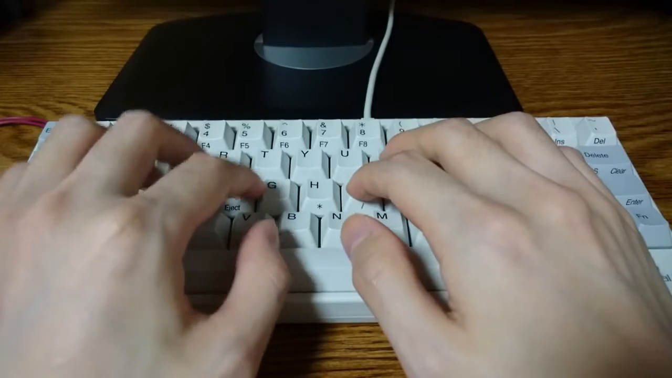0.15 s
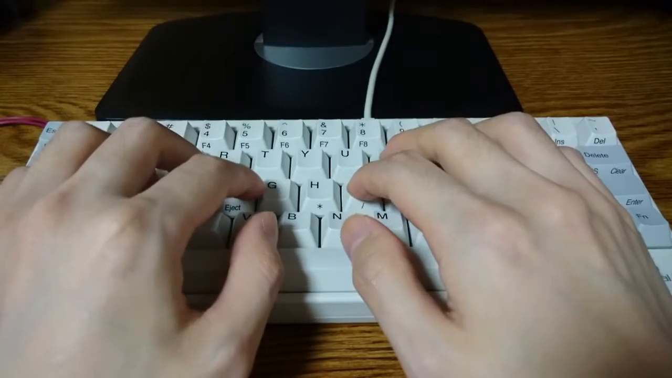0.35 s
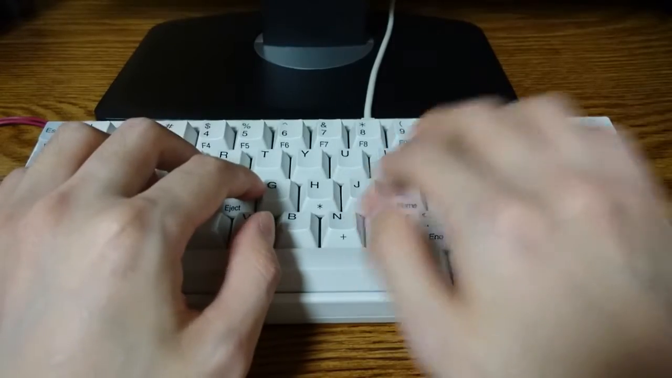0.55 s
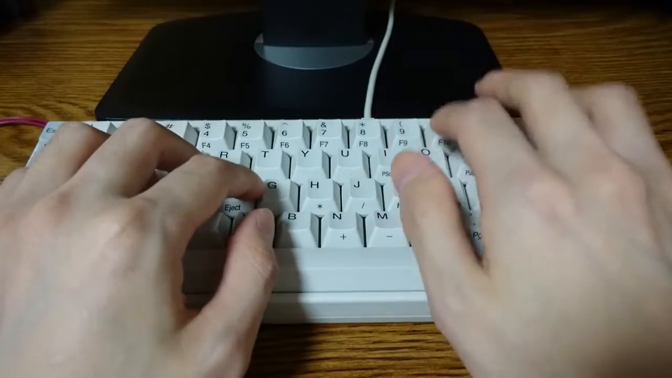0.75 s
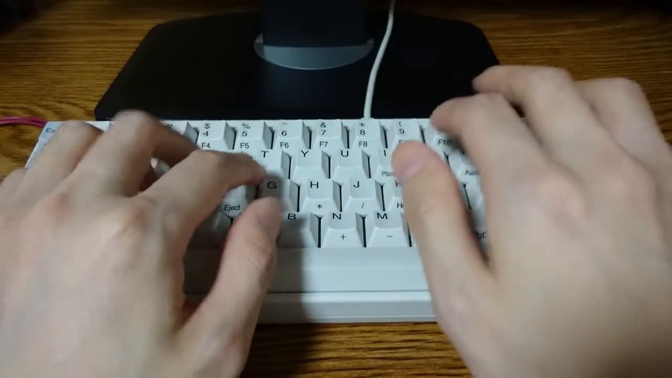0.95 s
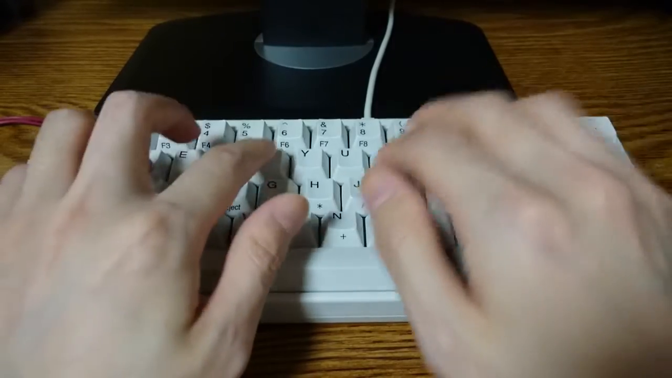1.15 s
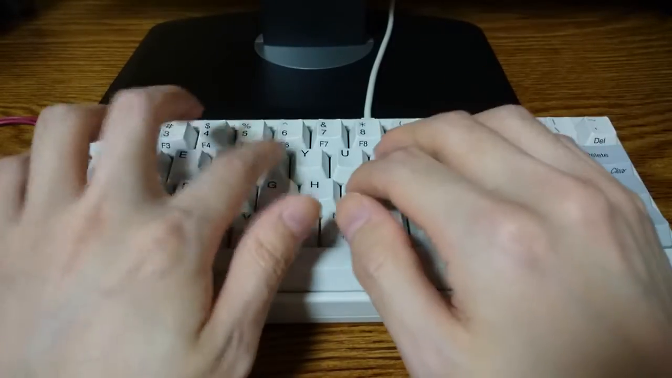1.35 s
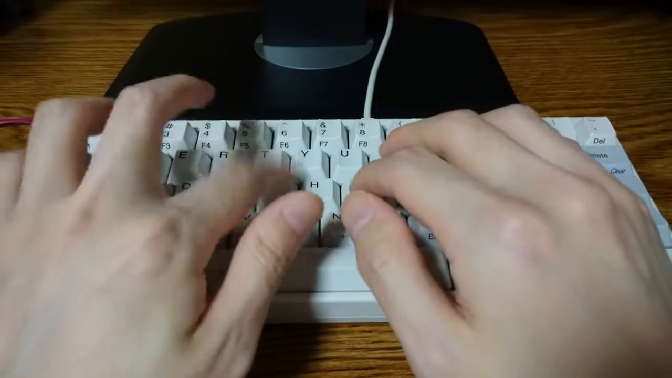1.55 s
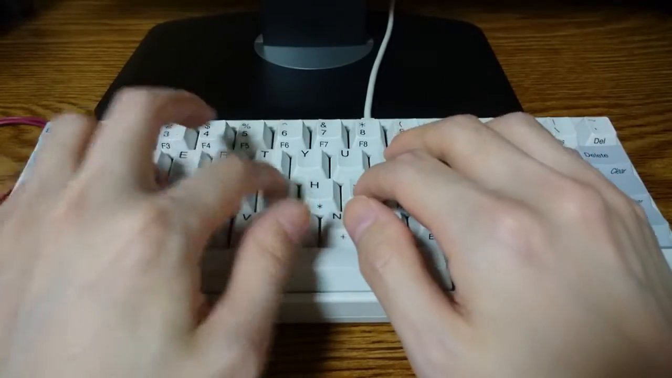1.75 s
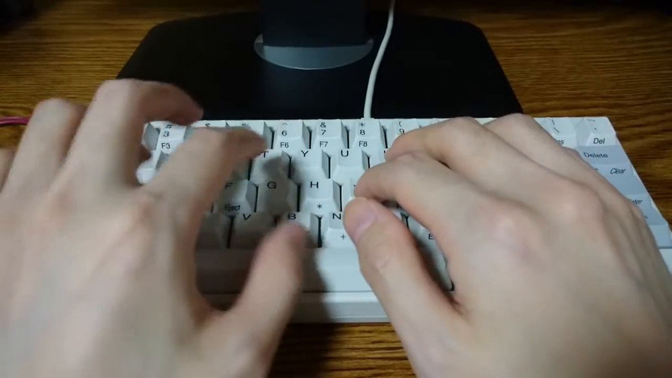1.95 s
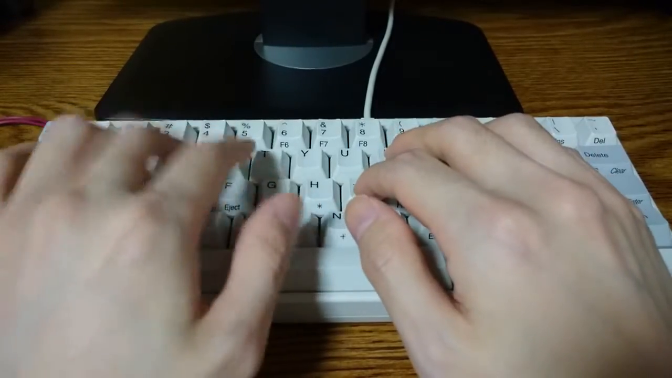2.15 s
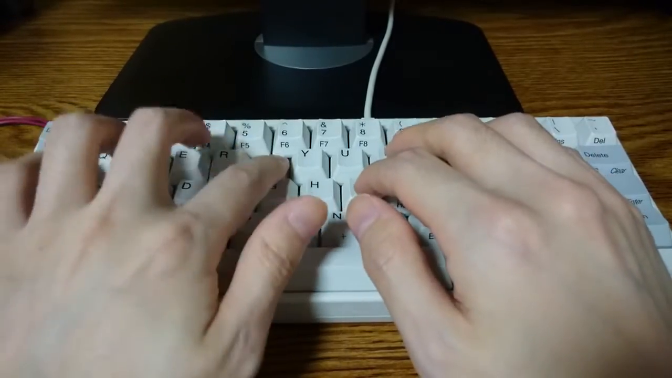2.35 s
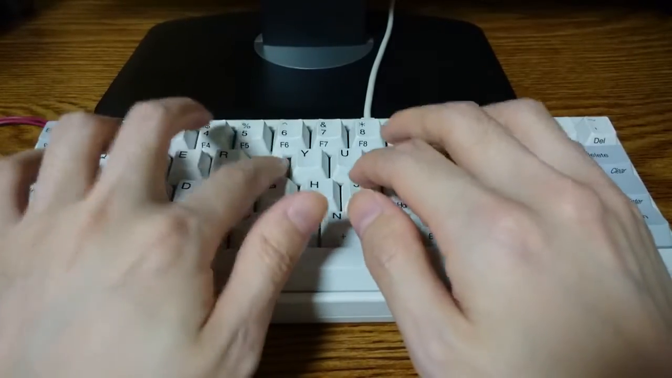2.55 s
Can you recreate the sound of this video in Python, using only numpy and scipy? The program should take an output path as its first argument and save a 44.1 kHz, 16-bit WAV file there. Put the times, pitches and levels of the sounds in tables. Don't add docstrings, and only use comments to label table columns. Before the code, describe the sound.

Mechanical keyboard typing, close and dry. A loud, rattling space-bar clack lands at 0.06 s, with small ticks after it. Near silence follows, then a softer wide key bottoms at 0.77 and springs back around 1.0. After a pause, a fast burst of crisp letter keys and space bar runs 1.67-2.05, another 2.1-2.5, with faint pings, case and desk thumps, and low room hiss.

```python
import sys
import numpy as np
from scipy import signal
from scipy.fft import rfft, irfft
from scipy.io import wavfile
from scipy.ndimage import uniform_filter1d

SR = 44100
rng = np.random.default_rng(int(sys.argv[2]) if len(sys.argv) > 2 else 0)


def rack_gain(trim_db):
    fader = np.asarray(trim_db, float)
    return 10 ** (fader / 20)


def transcribe(u):
    v = np.clip(np.atleast_2d(u).T, -1, 1)
    q = np.round(v * 32767).astype(np.int16)
    wavfile.write(sys.argv[1], SR, q)


N = 119070
SPAN, LEAD = 8192, 3072
RISE_S = .0007

# frequency in Hz, level in dB, t60 in seconds.
WIDE_MODES = [(2770, -3.5, 0.015), (2930, -2, 0.0055), (3600, -2.5, 0.018), (4360, 0.5, 0.0087),
              (4660, 9.5, 0.014), (5070, 2.5, 0.018), (5540, -14, 0.018), (6330, 3, 0.016),
              (7730, -5.5, 0.0096)]
# frequency in Hz, level in dB, t60 in seconds.
TICK_MODES = [(9900, -7, .002), (11800, -9, .002), (14200, -4, .002), (15600, -1, .002)]


def evened(x):
    return x / np.sqrt(np.mean(x ** 2) + 1e-20)


def read(points, hz):
    f, value = np.transpose(points)
    return np.interp(np.log(hz + 1), np.log(f + 1), value)


def colour(x, points):
    return irfft(rfft(x) * rack_gain(read(points, np.fft.rfftfreq(N, 1 / SR))), N)


def grain(noise, size):
    return rack_gain(3 * evened(uniform_filter1d(noise, size=size)))


def ring(drive, modes, luck, db, tilt_db=0., damp=1., detune=0.01232):
    scatter_db, soft_s = 2.5, .0004
    t = np.arange(SPAN - LEAD) / SR
    hz, top_db, t60 = np.transpose(modes)[:, :, None]
    level_luck, pitch_luck = luck[:len(hz), None], luck[16:16 + len(hz), None]
    level_db = top_db + tilt_db * np.log2(hz / hz.mean()) + scatter_db * level_luck
    level = rack_gain(level_db - 60 * t / np.maximum(t60 * damp, .002))
    tones = level * np.sin(2 * np.pi * hz * (1 + detune * pitch_luck) * t)
    body = tones.sum(0) * np.sin(np.pi / 2 * np.minimum(t / soft_s, 1)) ** 2
    out = signal.fftconvolve(drive, body)[:SPAN]
    return rack_gain(db) * out / abs(out).max()


def strokes(table, modes, chatter_s=None, lean_db=0., cap_under_db=0., dulling=0., ticks=TICK_MODES):
    # frequency in Hz, level in dB, t60 in seconds.
    cap_modes = [(760, -5, .02), (950, -5, .018), (1170, -2, .015), (1340, 0, .012), (1580, -4, .012),
                 (1860, -2, .012), (2150, -4, .008)]
    # frequency in Hz, level in dB, t60 in seconds.
    case_modes = [(82.4, -9, 0.0229), (121.1, 4.5, 0.029), (188.8, -8, 0.12), (291, 2.5, 0.062),
                  (352, -6, 0.087), (450.4, 0.5, 0.074), (508.5, 5, 0.026)]
    hold_share, strike, strike_s = 0.15, 1.2, .0006
    scrape_db, scrape_s = -11, 0.021
    rattle_db, rattle_t60, loose_damp, loose_tick_db = -14, 0.15, .28, 5
    push_s, thump_late_s = 0.00024, 0.0014
    mix, t = np.zeros(N + SPAN + LEAD), (np.arange(SPAN) - LEAD) / SR
    noise = rng.standard_normal((len(table), 3, SPAN))
    luck = rng.standard_normal((len(table), 4, 32))
    for (s, clack_db, thump_db, tick_db, last), (a, b, c), lot in zip(table, noise, luck):
        cap_db = last + 4 if chatter_s else (1 + dulling) * clack_db + cap_under_db
        tilt_db = lean_db + dulling * clack_db
        chatter = max(chatter_s or last, .002)
        rough = grain(b, 40)

        decay = rack_gain(-60 * np.maximum(t - hold_share * chatter, 0) / chatter)
        shape = rough * np.clip(t / RISE_S, 0, 1) * decay
        shape = shape + strike * rough * (t > 0) * np.exp(-np.maximum(t, 0) / strike_s)
        scrape = rack_gain(scrape_db) * np.exp(-(t / scrape_s) ** 2)
        rattle = rack_gain(-60 * t / rattle_t60)
        loose = np.where(t < 0, scrape, rattle) * rough
        u = np.maximum(t - thump_late_s, 0) / push_s
        push = 0.9 * shape * c - u * np.exp(-u)

        sound = ring(shape * a, modes, lot[0], clack_db, tilt_db)
        sound += ring(shape * c, cap_modes, lot[1], cap_db)
        sound += ring(push, case_modes, lot[2], thump_db + 6.5, detune=.024)
        sound += ring(shape * a, ticks, lot[3], tick_db + 8)
        sound += ring(loose * c, modes, lot[0], clack_db + rattle_db, tilt_db, loose_damp)
        sound += ring(loose * a, cap_modes, lot[1], cap_db + rattle_db, damp=loose_damp)
        sound += ring(loose * b, TICK_MODES, lot[3], tick_db + loose_tick_db + rattle_db, damp=loose_damp)
        mix[round(s * SR):][:SPAN] += sound
    return mix[LEAD:LEAD + N]


def space_bar():
    # start in seconds, clack, thump and tick levels in dB, chatter t60 in seconds.
    bar_strokes = [(.0185, -42.5, -60.5, -84.5, 0.021), (.0372, -28, -44.5, -77.5, 0.011),
                   (.0570, -34, -43.5, -73, 0.022), (.0625, -16.5, -31, -34.5, 0.03),
                   (.0781, -47.5, -41, -66.5, 0.0038), (.0895, -35, -61, -77, 0.007),
                   (.0978, -42, -58, -70.5, 0.016), (.1058, -36, -60, -73, 0.0088),
                   (.1115, -30.5, -73, -68.5, 0.007), (.1540, -32, -47.5, -87, 0.014),
                   (.2680, -49, -76, -92, 0.05), (.2835, -50.5, -92, -89, 0.017),
                   (1.9098, -27.5, -46, -67, 0.053), (1.9318, -17, -31, -37.5, 0.022),
                   (1.9796, -32.5, -52, -80, 0.0078), (2.0014, -34, -59, -76, 0.018),
                   (2.028, -39, -56, -88, 0.018), (2.0416, -32, -43.5, -88, 0.018),
                   (2.0536, -36, -50.5, -89, 0.038), (2.5638, -56, -61.5, -91, 0.03),
                   (2.6785, -59, -70.5, -88, 0.12)]
    # frequency in Hz, level in dB, t60 in seconds.
    bar_modes = [(2620, -12.5, 0.017), (3028, 1.5, 0.012), (3280, -1.5, 0.0061), (3530, -18.5, 0.0052),
                 (4400, -15, 0.0048), (5644, -5.5, 0.0065), (6280, -6.5, 0.007), (8500, -33.5, 0.0087)]
    # frequency in Hz, level in dB, t60 in seconds.
    wire = (13700, -6.5, 0.00816)
    return strokes(bar_strokes, bar_modes, lean_db=3.2, cap_under_db=-6.5, dulling=.22,
                   ticks=[*TICK_MODES, wire])


def letter_keys():
    # start in seconds, clack, thump, tick and cap levels in dB.
    bright = [(1.6684, -31, -56, -93, -47), (1.6968, -28, -43.5, -92, -32),
              (1.7709, -24, -43.5, -53.5, -35.5), (2.1032, -27.5, -46.5, -68, -51),
              (2.1286, -29, -38.5, -69, -38.5), (2.2044, -48, -77, -75, -62),
              (2.2314, -24, -39.5, -50.5, -35), (2.2530, -46, -42.5, -74, -34.5),
              (2.2650, -26, -47.5, -54, -28), (2.3259, -46.5, -68, -67, -72),
              (2.3491, -30, -75, -51, -33.5)]
    # start in seconds, clack, thump, tick and cap levels in dB.
    dull = [
        (0.4973, -63.5, -74, -87.5, -62),
        (1.7870, -21, -33.5, -49.5, -27.5),
        (1.8393, -20, -43.5, -58.5, -41),
        (1.8637, -48, -63, -74, -67),
        (1.9625, -26, -47, -73, -30.5),
        (2.3635, -36.5, -55, -75, -50),
        (2.4193, -27.5, -56, -77, -42),
        (2.4407, -27, -47, -57, -33.5),
        (2.4879, -49, -61, -75, -58),
    ]
    # frequency in Hz, level in dB, t60 in seconds.
    key_modes = [(2226, -8, 0.0083), (2733, -9, 0.0095), (3087, -7.5, 0.013), (3684, -3.5, 0.0063),
                 (4320, -3, 0.0059), (4994, -10.5, 0.016), (5890, -9, 0.0098), (6220, -23.5, 0.014),
                 (7450, -22, 0.0031), (8250, -46, 0.0025)]
    return strokes(bright, key_modes, 0.019, -3.5) + strokes(dull, key_modes, 0.023, -7)


def wide_key():
    # start in seconds, clack, thump and tick levels in dB, chatter t60 in seconds.
    wide_strokes = [
        (0.751, -44.5, -51.5, -77, 0.029),
        (0.7736, -37, -37, -55, 0.013),
        (0.8405, -38, -46.5, -92, 0.091),
        (0.8967, -52, -55.5, -85, 0.22),
        (0.9255, -42, -39.5, -64.5, 0.013),
        (0.997, -39.5, -43.5, -88, 0.0091),
        (1.0248, -47.5, -52.5, -92, 0.046),
        (1.0407, -54.5, -57, -93, 0.11),
    ]
    return strokes(wide_strokes, WIDE_MODES, cap_under_db=-2)


def pings():
    # start in seconds, level in dB, frequency in Hz,
    # t60 in seconds.
    snaps = [(.0375, -46, 3200, .02), (0.064, -17, 3220, .015), (0.067, -18.5, 2904, .02),
             (.0660, -31.5, 437, 0.1), (.0775, -49, 2900, 0.022), (.154, -41, 480, 0.045),
             (.7505, -36.5, 4740, 0.02), (.752, -50.5, 1300, 0.056), (.776, -45.5, 308.5, 0.2),
             (.841, -41.5, 1543, 0.053), (.8415, -46, 4990, 0.042), (.8965, -46.5, 4240, 0.021),
             (.8965, -47, 1110, .03), (.926, -51.5, 291, 0.21), (.926, -37, 4675, 0.015),
             (.842, -48, 3600, 0.067), (.9985, -42.5, 3610, 0.1), (1.0013, -45, 1770, 0.0054),
             (1.04, -48, 1200, .04), (1.698, -44, 503, 0.11), (1.698, -46, 1190, 0.056),
             (1.7722, -18, 5450, 0.0028), (1.772, -32, 3370, 0.022), (1.787, -19.5, 1225, 0.018),
             (1.788, -26, 259.5, 0.042), (1.7893, -16.5, 3200, 0.0064), (1.8395, -27.5, 2684, 0.051),
             (1.84, -49, 1877, 0.056), (1.92, -30.5, 1222, 0.064), (1.933, -34.5, 441, 0.096),
             (1.9325, -20, 3055, 0.02), (1.9635, -32.5, 1905, 0.044), (2.029, -36, 3110, 0.018),
             (2.104, -31.5, 3900, 0.026), (2.104, -29, 6500, 0.015), (2.13, -34.5, 535, 0.056),
             (2.2315, -33.5, 1163, 0.064), (2.2323, -14, 4700, 0.0032), (2.2535, -30, 4450, 0.0087),
             (2.2655, -19.5, 586, 0.01), (2.2665, -14.5, 4780, 0.0031), (2.2665, -30, 2005, 0.019),
             (2.35, -40, 3640, 0.079), (2.35, -40, 6400, 0.05), (2.35, -36, 940, 0.016),
             (2.4195, -28, 2960, 0.027), (2.4415, -30, 2970, 0.022), (2.4415, -30, 5100, 0.013),
             (2.565, -50.5, 2960, 0.021), (2.679, -43.5, 2972, 0.088)]
    # start in seconds, level in dB, frequency in
    # Hz, t60 in seconds.
    knocks = [
        (.064, -35, 800, 0.048),
        (.0978, -35, 2180, 0.0057),
        (1.003, -51, 745, 0.13),
        (1.9335, -25, 4400, 0.021),
    ]
    wobble, wobble_cycles = .7, 5
    mix, t = np.zeros(N + SPAN), np.arange(SPAN) / SR
    tones = [*snaps, *knocks]
    for (s, db, hz, t60), noise in zip(tones, rng.standard_normal((len(tones), 2, SPAN))):
        size = int(wobble_cycles * SR / hz)
        a, b = (evened(uniform_filter1d(uniform_filter1d(v, size=size), size=9)) for v in noise)
        depth = wobble * np.minimum(t * hz / wobble_cycles, 1)
        tone = (1 + depth * a / 2) * np.sin(2 * np.pi * hz * t + depth * b)
        rise = np.minimum(t / min(RISE_S, t60 / 20), 1)
        mix[round(s * SR):][:SPAN] += rack_gain(db - 60 * t / t60) * tone * rise
    return mix[:N]


def slides():
    # start in seconds, length in seconds, level in dB.
    rubs = [
        (0.714, 0.05, -57.5),
        (0.804, 0.04, -50),
        (0.851, 0.035, -57),
        (0.996, 0.034, -51),
        (1.631, 0.042, -56.5),
        (1.927, 0.027, -43),
        (2.251, 0.018, -38),
        (2.449, 0.16, -62),
    ]
    modes = [*WIDE_MODES, (800, 13, 0.0091), (1200, 13, 0.0058), (1780, -10, 0.0099)]
    mix, noise = np.zeros(N + SPAN), rng.standard_normal((len(rubs), 2, SPAN))
    for (s, length, db), (a, b) in zip(rubs, noise):
        swell = np.sin(np.pi * np.clip(np.arange(SPAN) / SR / length, 0, 1)) * grain(b, 60)
        mix[round(s * SR):][:SPAN] += ring(swell * a, modes, b, db, damp=0.54)
    return mix[:N]


def desk():
    # start in seconds, level in dB.
    pushes = [(0.065, -41), (0.156, -47), (0.777, -44.5), (1.699, -43), (1.789, -55), (1.931, -52),
              (2.131, -40), (2.268, -30.5), (2.44, -46.5), (2.562, -53.5)]
    # frequency in Hz, level in dB, t60 in seconds.
    wood_modes = [(89.6, -3.5, 0.086), (104.8, -3, 0.19), (129.7, -0.5, 0.096)]
    mix, u = np.zeros(N + SPAN), np.arange(SPAN) / SR / 0.00059
    for (s, db), lot in zip(pushes, rng.standard_normal((len(pushes), 32))):
        mix[round(s * SR):][:SPAN] += ring(-u * np.exp(-u), wood_modes, lot, db)
    return mix[:N]


def room(x):
    # frequency in Hz, t60 in seconds.
    decay = [(100, 0.52), (500, 0.75), (2000, 0.4), (5000, 0.17), (9000, 0.22), (15000, 0.23)]
    taps = np.zeros((2, SR // 2))
    at = np.arange(120, SR // 2 - 20, 20) + rng.integers(0, 20, (2, (SR // 2 - 121) // 20))
    np.put_along_axis(taps, at, rng.choice([-1., 1.], at.shape), 1)
    hz, t, z = signal.stft(taps, SR, nperseg=256)
    tail = signal.istft(z * rack_gain(-60 * t / read(decay, hz)[:, None]), SR, nperseg=256)[1]
    return signal.fftconvolve(x[None], tail / np.linalg.norm(tail[0]), axes=1)[:, :N]


def hush():
    # frequency in Hz, level in dB per Hz.
    spectrum = [(20, -3), (60, -4), (90, -11), (250, -19), (1800, -23.5), (3500, -29.5), (6500, -40.5),
                (16000, -40.5)]
    return rack_gain(-66) * np.array([evened(colour(v, spectrum)) for v in rng.standard_normal((2, N))])


def scene():
    # frequency in Hz, gain in dB.
    port = [(6400, -0.5), (7200, -2), (8000, 2.5), (9500, -2.5), (12000, -2)]
    # frequency in Hz, side level under mid in dB.
    apart = [(40, -37.5), (150, -33.5), (1500, -37), (3000, -36.5), (5000, -24), (8500, -17.5),
             (15000, -22)]
    keys = space_bar() + letter_keys() + wide_key() + pings() + slides() + desk()
    keys = colour(keys, port)
    keys = signal.sosfilt(signal.butter(3, 71, "high", fs=SR, output="sos"), keys)
    (wet, other), (air, air_other) = room(keys), hush()
    mid = keys + rack_gain(-20) * wet + air
    turned = signal.hilbert(keys).imag
    side = colour(other + rack_gain(-1) * turned + rack_gain(20) * air_other, apart)
    return np.array([mid + side, mid - side])


def top_cut(x):
    return signal.sosfilt(signal.butter(12, 16790, fs=SR, output="sos"), x)


def record(dry):
    low_pass = signal.firwin(511, 16000, window=("kaiser", 5), fs=SR)
    return top_cut(signal.oaconvolve(dry, low_pass[None], "same"))


dry = scene()
out = record(dry)
transcribe(out)
```